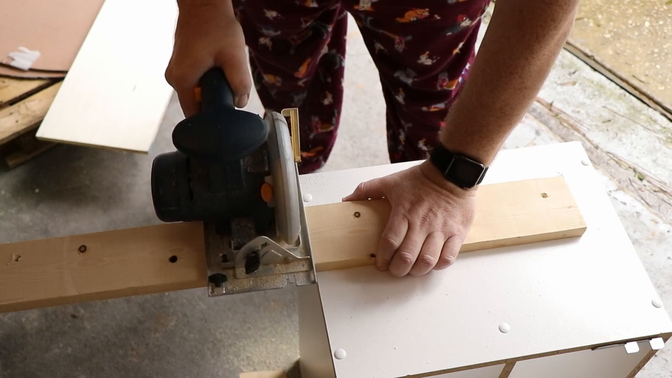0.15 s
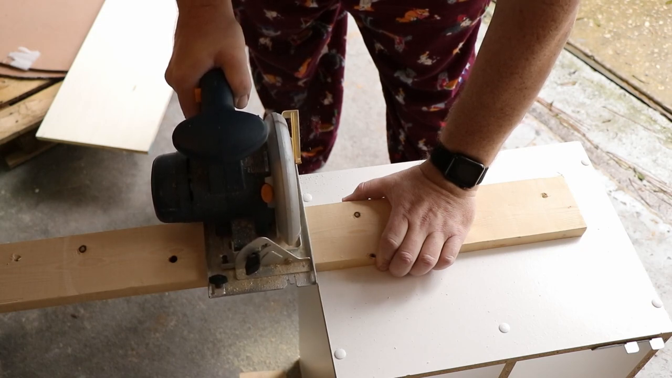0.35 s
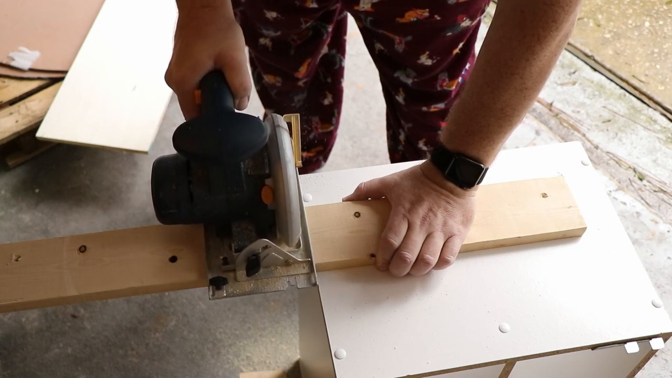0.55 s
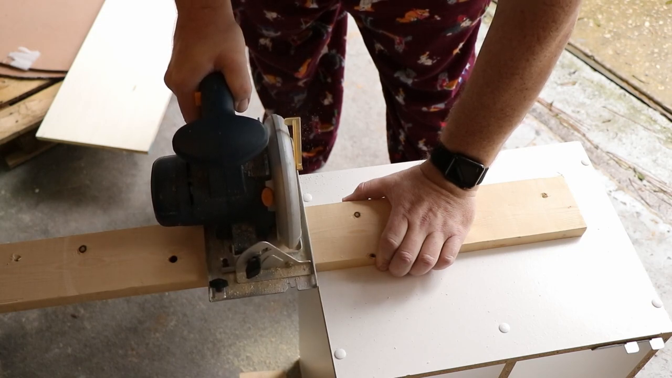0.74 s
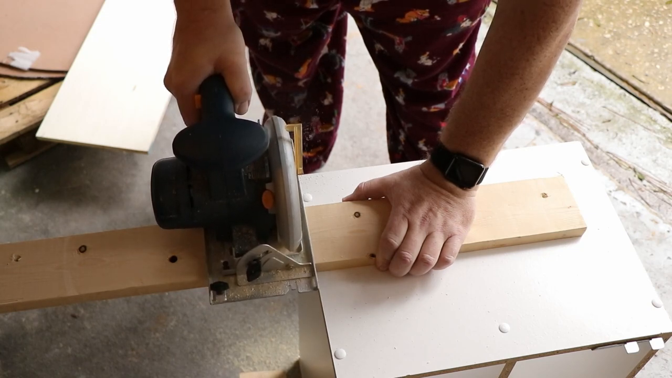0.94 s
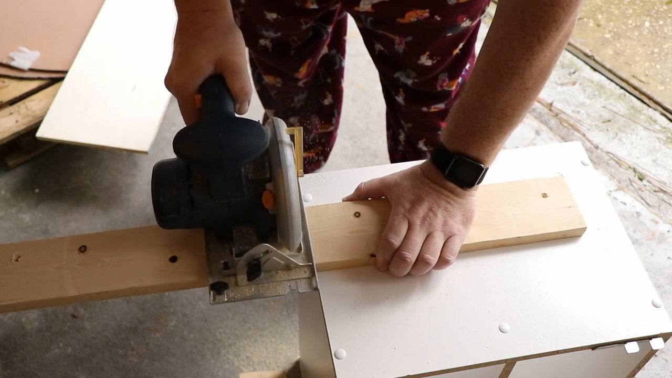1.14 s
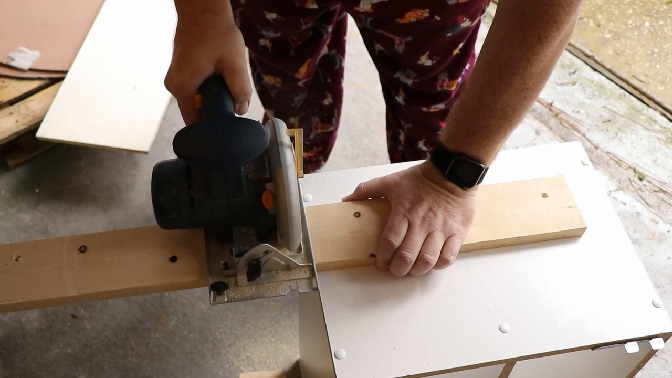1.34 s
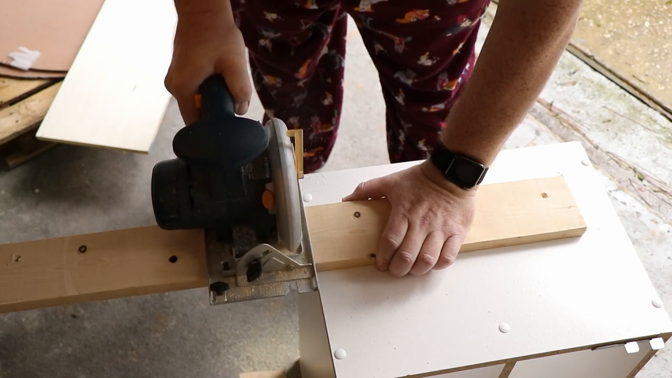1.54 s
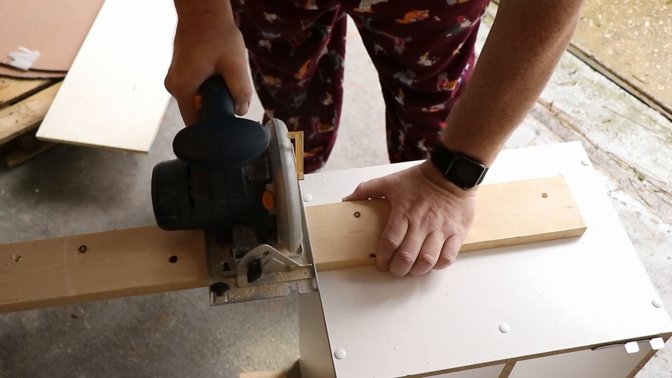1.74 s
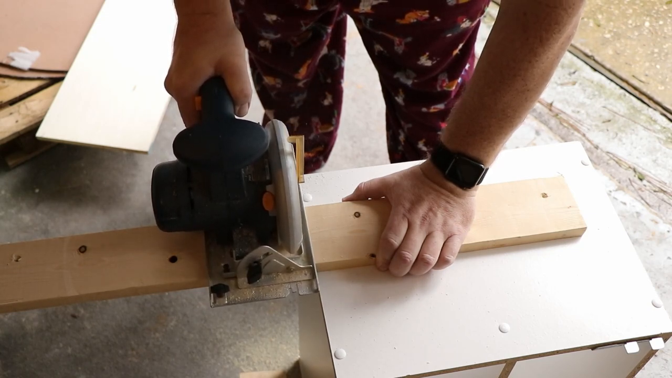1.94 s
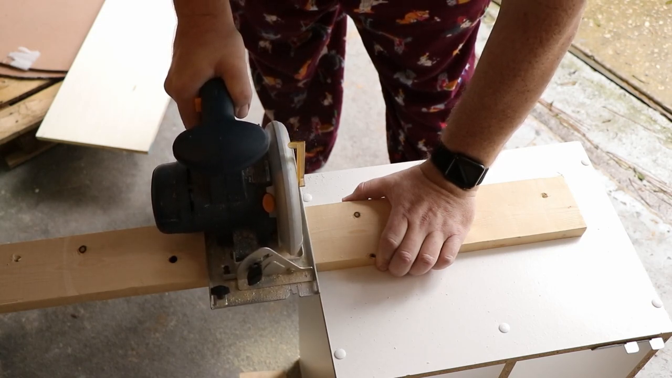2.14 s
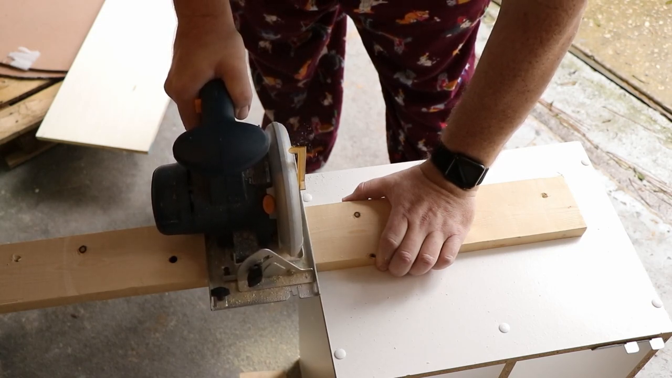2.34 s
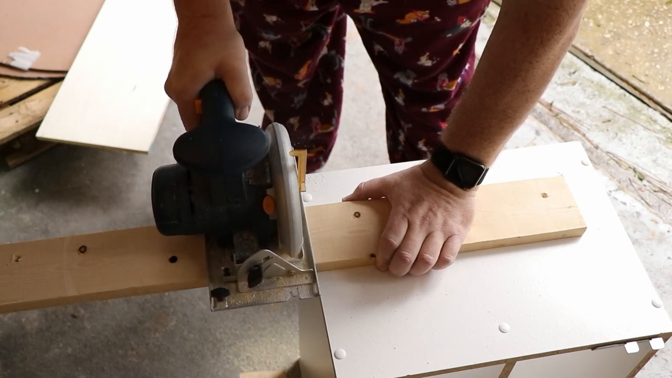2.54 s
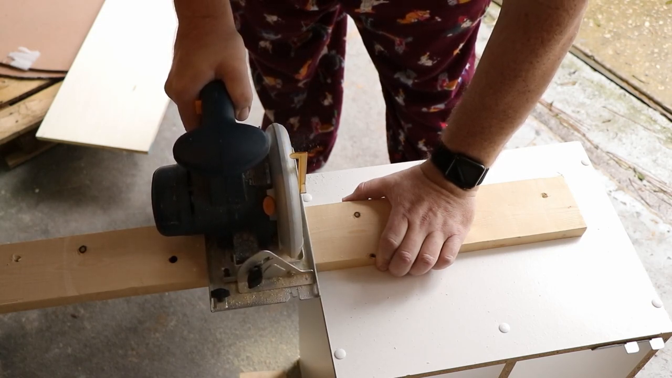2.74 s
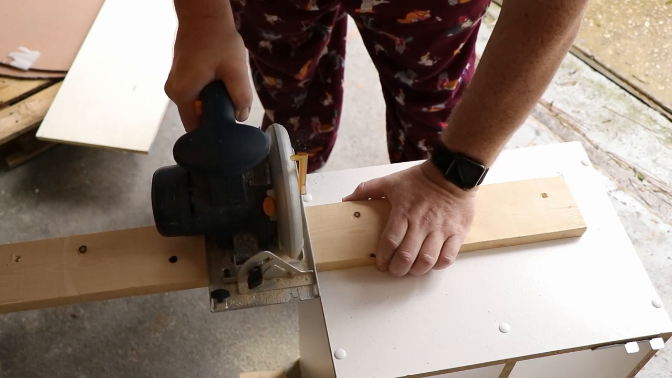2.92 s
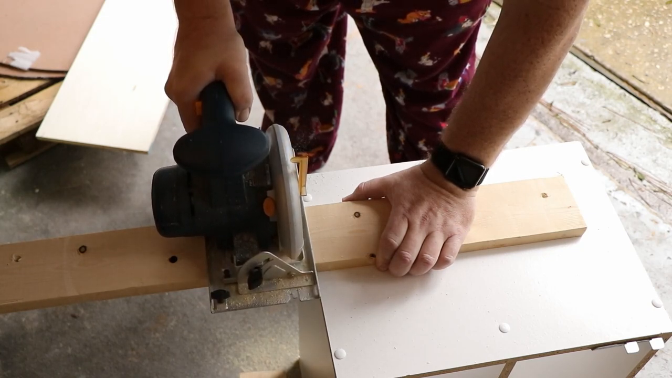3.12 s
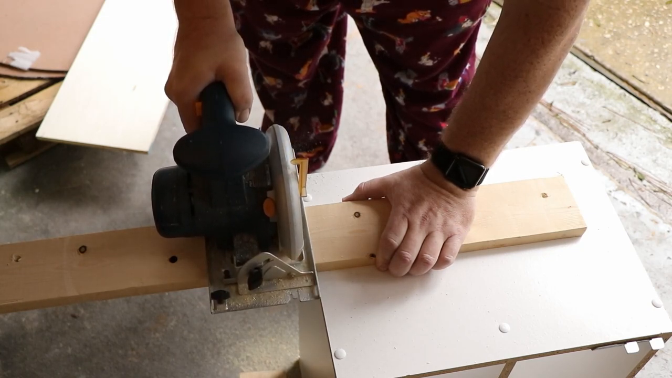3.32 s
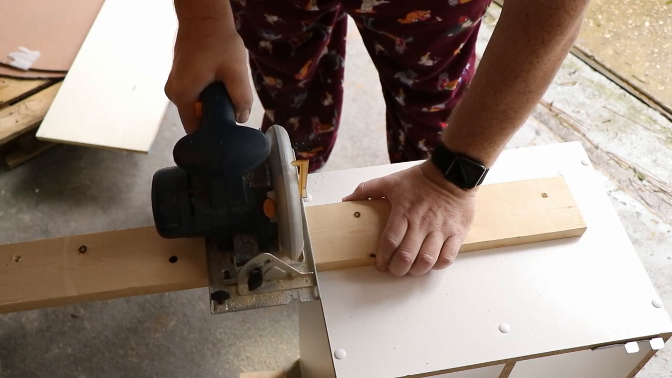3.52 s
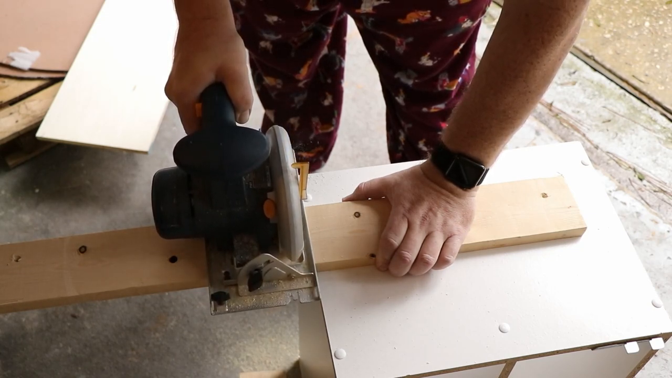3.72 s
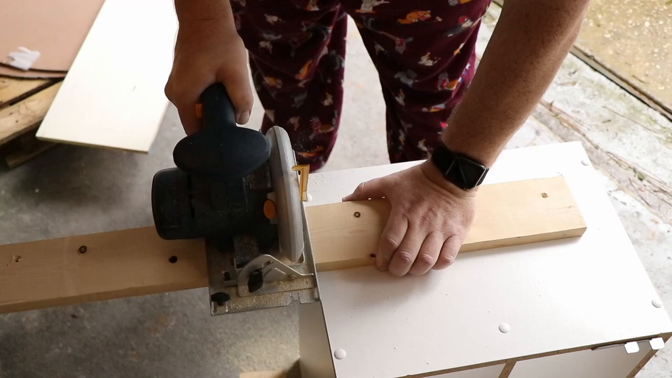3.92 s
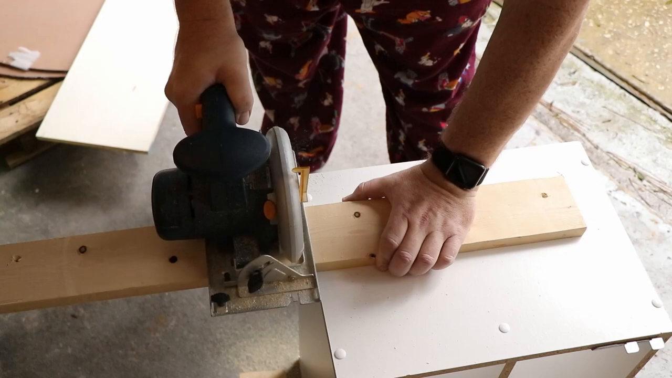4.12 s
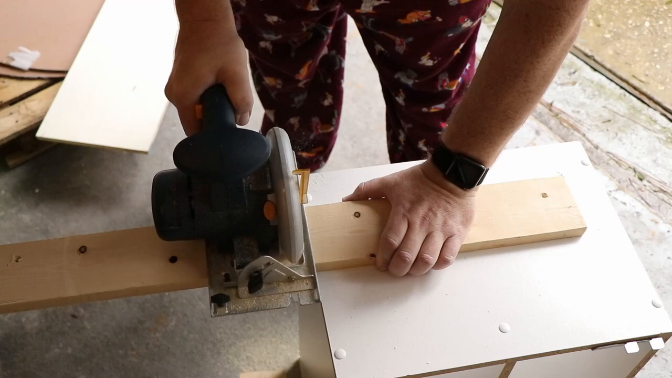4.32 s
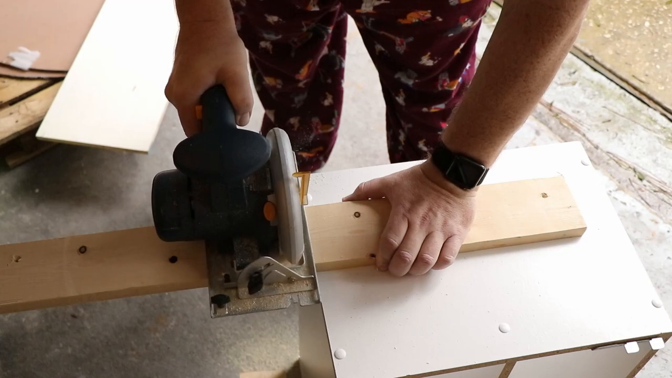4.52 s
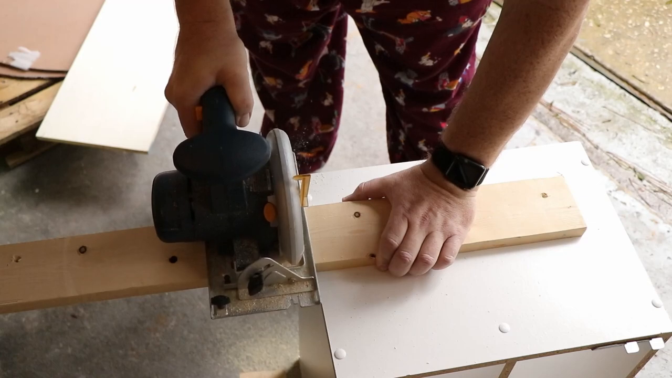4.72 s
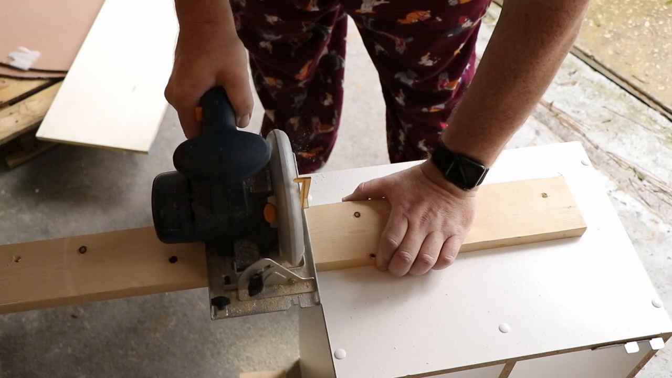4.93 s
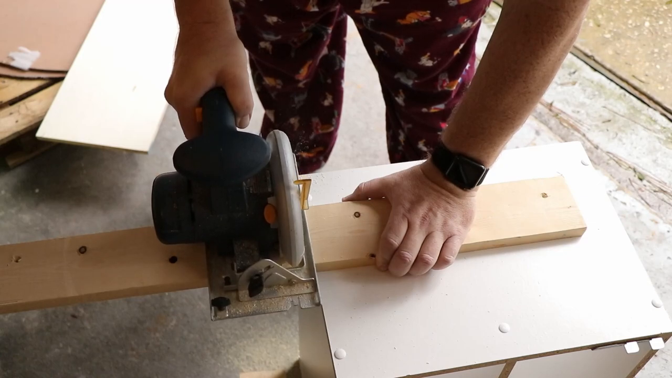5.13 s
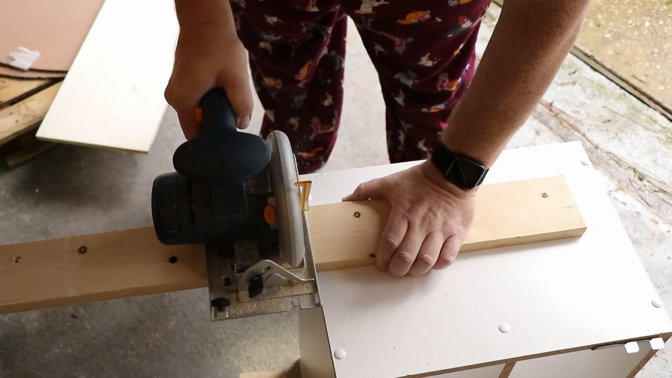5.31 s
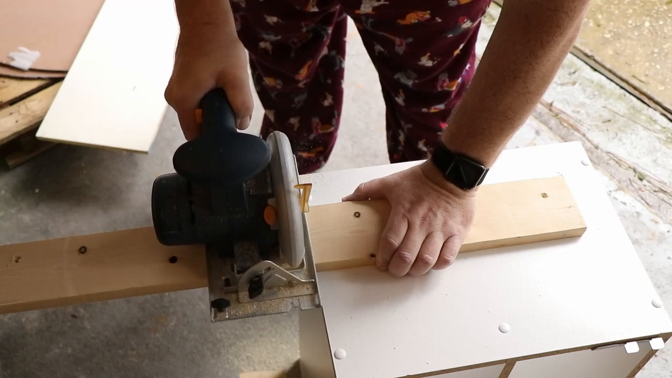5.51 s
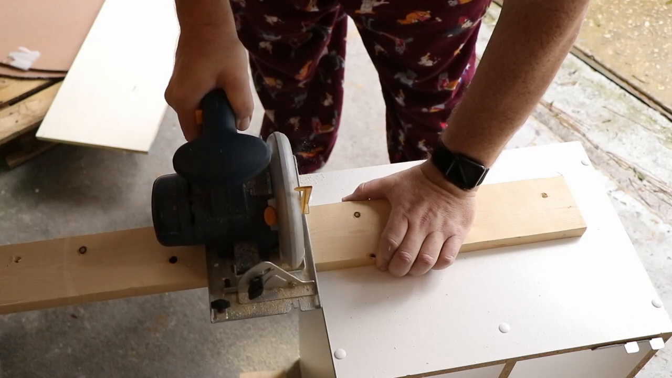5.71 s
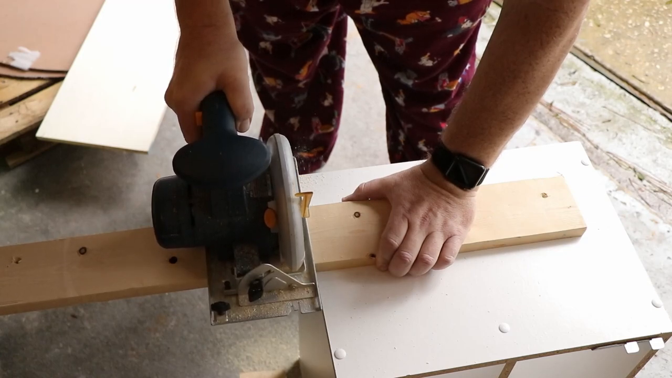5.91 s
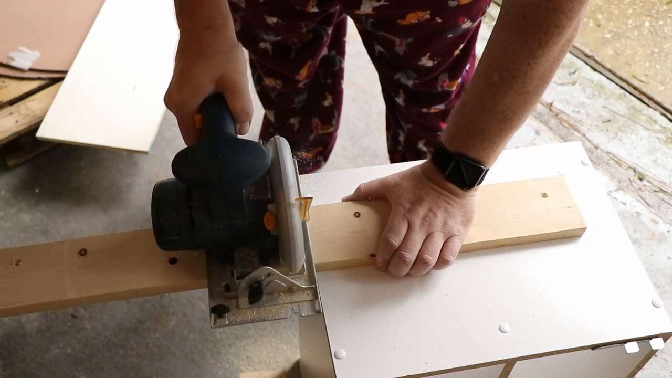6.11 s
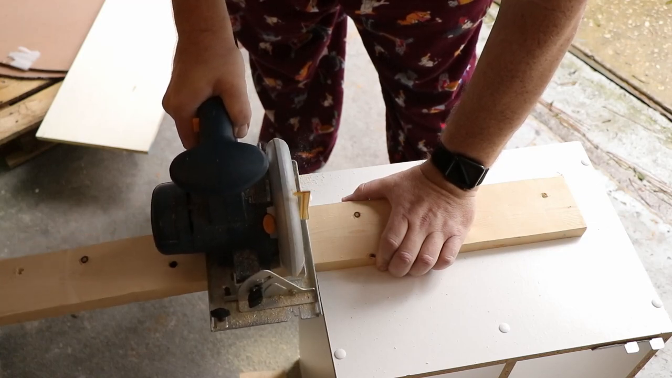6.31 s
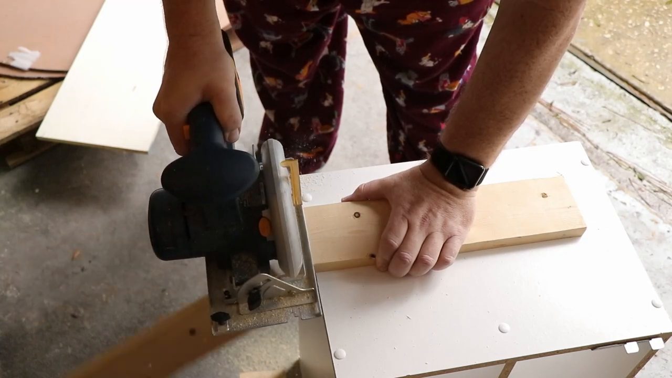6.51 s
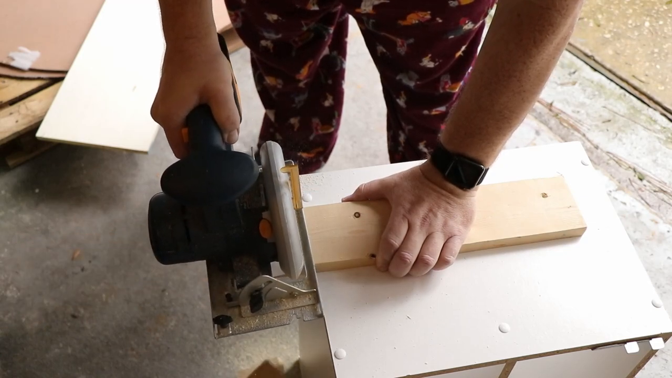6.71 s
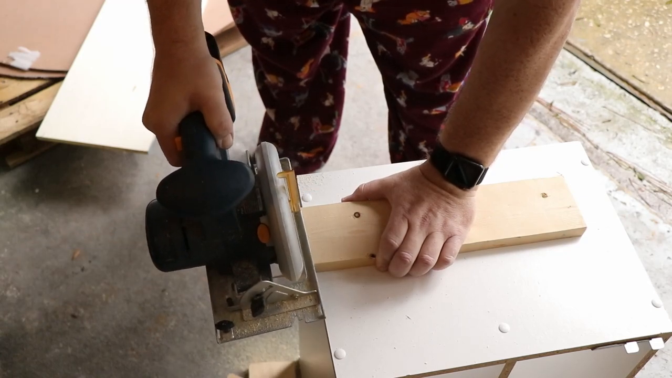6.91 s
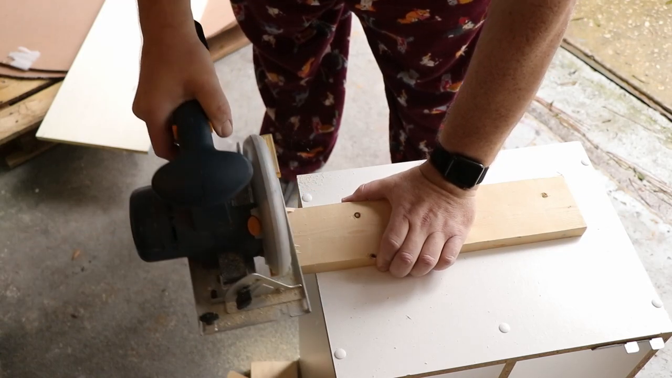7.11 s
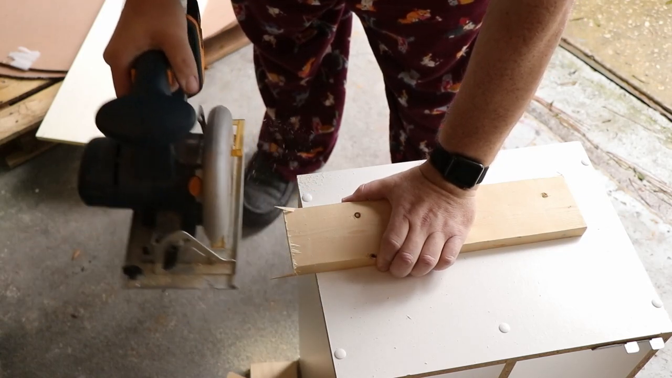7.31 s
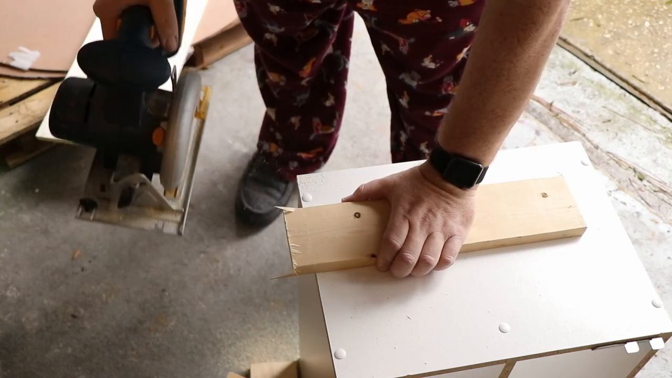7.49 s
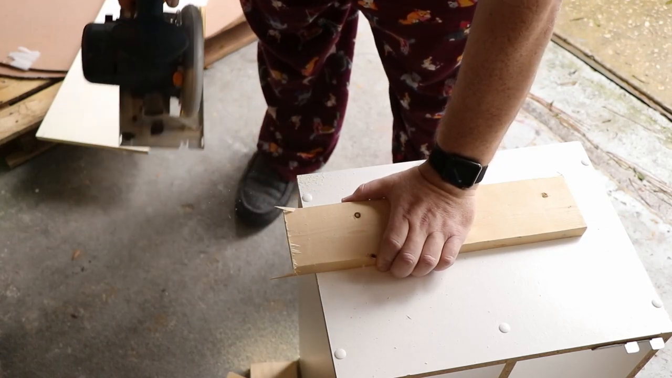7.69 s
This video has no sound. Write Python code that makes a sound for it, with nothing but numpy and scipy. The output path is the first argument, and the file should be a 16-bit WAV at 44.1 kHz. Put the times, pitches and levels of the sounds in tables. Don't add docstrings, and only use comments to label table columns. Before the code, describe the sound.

Close and loud in a hard, echoing garage workshop, saw teeth tear through wood with a dense, rough buzz and shifting piercing tones. Faint bench thuds sit beneath the early cut. After about six seconds the load releases, the board cracks, the loose piece thumps down, the spinning blade drags and rings briefly, the guard snaps closed, and only an airy motor whir remains. Bass is thin and peaks are squashed.

```python
import sys
import numpy as np
from scipy import signal
from scipy.fft import rfft, irfft, next_fast_len
from scipy.io import wavfile
from scipy.ndimage import uniform_filter1d, minimum_filter1d, map_coordinates

SR = 44100
rng = np.random.default_rng(int(sys.argv[2]) if len(sys.argv) > 2 else 0)


def level_to_linear(level):
    exponent = np.asarray(level, float) / 20
    return 10 ** exponent


def master_out(mix):
    frames = np.transpose(np.atleast_2d(mix))
    ceiling = np.clip(frames, -1, 1)
    pcm = np.round(ceiling * 32767).astype(np.int16)
    wavfile.write(sys.argv[1], SR, pcm)


N = 341765


def unit(x):
    return x / np.sqrt(np.mean(x ** 2) + 1e-20)


def along(points, hz):
    point_hz, value = np.transpose(points)
    return np.interp(np.log(hz + 1), np.log(point_hz + 1), value)


def curves(rows):
    time_s, *columns = np.transpose(rows)
    return [np.interp(np.arange(N) / SR, time_s, column) for column in columns]


def wobble(rate_hz, t=None):
    t = np.arange(N) / SR if t is None else t
    knots = rng.standard_normal(int(N * 300 / SR) + 4)
    return map_coordinates(knots, [t * min(rate_hz, 300)], order=2)


def filtered(x, response):
    m = next_fast_len(N + SR)
    return irfft(rfft(x, m) * response(np.fft.rfftfreq(m, 1 / SR)), m)[..., :N]


def resonance(f, hz, width_hz):
    return 1j * f * width_hz / (hz * hz - f * f + 1j * f * width_hz)


def peaked(f, spectrum, modes):
    peaks = sum((level_to_linear(db) - 1) * np.abs(resonance(f, hz, width_hz)) ** 2 for hz, width_hz, db in modes)
    return level_to_linear(along(spectrum, f)) * (1 + peaks)


# (time [s], speed [turns/s])
SHAFT_SPEED = [(0, 62.9), (.18, 62.7), (.47, 64.4), (.79, 62.4), (1.04, 63.8), (1.29, 62.1), (1.58, 63.15),
               (1.94, 63.3), (2.3, 60.2), (2.55, 59.7), (3.08, 60.6), (3.33, 59.9), (3.86, 59.8),
               (4.6, 57.5), (5.44, 56.65), (5.66, 55.55), (6.26, 53.9), (6.47, 58)]
RUN_UP_TURNS_PER_S2, FREE_TURNS_PER_S, INERTIA_S = 8.8, 66, .1


def shaft():
    since_free = np.maximum(np.arange(N) / SR - SHAFT_SPEED[-1][0], 0)
    speed = np.minimum(curves(SHAFT_SPEED)[0] + RUN_UP_TURNS_PER_S2 * since_free, FREE_TURNS_PER_S)
    speed = uniform_filter1d(speed, round(INERTIA_S * SR))
    return np.cumsum(speed) / SR, speed


# (time [s], force [dB], sharpness of bite [dB])
FEED = [(0, -21.5, -4), (.11, -16.5, -4), (.44, -21, -4.5), (.86, -16.5, -6.5), (1.15, -17, -5.5),
        (1.63, -17, -4.5), (2.13, -17, -9), (2.55, -14.5, -9.5), (3.3, -16.5, -8.5), (4.1, -18, -8),
        (4.36, -17.5, -8.5), (4.69, -17, -7), (5.33, -15.5, -9), (5.94, -16, -7), (6.2, -16, -6),
        (6.43, -20.5, -6.5), (6.53, -26.5, -4.5), (6.61, -21, -10.5)]
# (start [s], length [s], force [dB], sharpness [dB])
CONTACTS = [
    (6.637, .052, -13, 2),
    (6.772, .12, -16, -1),
    (6.89, .155, -19, 1),
    (7.075, .125, -17, -1),
]
ATTACK_S, LET_GO_DB_PER_S, DULLING_DB_PER_S = .01, 330, 200


def teeth():
    t = np.arange(N) / SR
    long_cut = (-0.94, 1 + FEED[-1][0], *curves(FEED))
    force, sharp = np.full(N, 1e-6), np.zeros(N)
    for start, length, db, sharp_db in [long_cut] + list(CONTACTS):
        after = np.maximum(t - start - length, 0)
        attack = np.clip((t - start) / ATTACK_S, 0, 1)
        push = level_to_linear(db - LET_GO_DB_PER_S * after) * attack
        force += push
        sharp += push * (sharp_db - DULLING_DB_PER_S * after)
    return force, sharp / force


STEPS_PER_TURN = 512


def pattern(turns, period, memory):
    rows = rng.standard_normal((int(turns[-1] / period) + 2, STEPS_PER_TURN * period))
    for _ in range(2):
        rows = uniform_filter1d(rows, max(round(memory), 1), axis=0)
    return unit(map_coordinates(rows.ravel(), [turns * STEPS_PER_TURN]))


TEETH = 24
# (time [s], level [dB])
LOCKED_LEVEL = [(0, -9), (1.1, -3.5), (1.4, -2.5), (2, -11), (2.2, -16.5), (2.6, -11.5), (3.3, -9),
                (4.2, -2), (5, -8.5), (5.4, -20.5), (6.1, -3), (6.5, 3.5), (7.75, -5.5)]
# (frequency [Hz], gain [dB])
LOCKED_COLOUR = [(100, -6), (700, -5), (1600, 2), (3000, -2), (6000, -5), (10000, -9)]
# (frequency [Hz], level [dB/Hz])
CUT_COLOUR = [(35, -86.5), (60, -55), (340, -32.5), (449, -22), (909, -18), (1100, -3), (1520, -3),
              (2010, -2), (2430, -18), (2830, -17), (3500, -18.5), (4070, -15), (10000, -30.5),
              (13000, -81), (22000, -120)]
# (frequency [Hz], width [Hz], level over colour [dB])
DAMPED_MODES = [(726, 28, 4), (1414, 40, 3.5), (1518, 130, 6.5), (2023, 73, 2), (2200, 110, 2),
                (2570, 87, 5.5), (2840, 76, 6), (3210, 250, -7.5), (4014, 34, 8), (4900, 46, 1.5),
                (5750, 70, 1.5), (6345, 120, 5), (8500, 150, 7)]
# (frequency [Hz], gain [dB])
ENTRY_COLOUR = [(100, 0), (2400, 3), (2600, 1.5), (3300, 18), (3550, -16.5), (4150, -6), (4350, 8),
                (4900, 6), (5300, 2), (10000, -2)]
# (frequency [Hz], gain [dB])
EXIT_COLOUR = [(100, 6), (1450, 4), (1750, 1), (2300, -5.5), (2800, 4.5), (3200, -3.5), (3800, 6.5),
               (4200, -8), (4600, -10.5), (5300, -4), (6200, 4), (8400, 4), (9600, 8)]
# (time [s], entering share [0-1], leaving share [0-1])
DEPTH = [(0, 0.59, 0.38), (.9, 0.36, 0.2), (1.3, 0.11, 0), (5.7, 0.17, 0.35), (6.3, 0.06, 0.21),
         (6.7, 0, 0.3), (6.8, 0, 0.68), (7.75, 0.1, 1)]
PART_EDGES_HZ = (900, 2350, 5000)
# (level against force [dB], share of sharpness [1])
PARTS = [
    (-1, 0.017),
    (-17, 0.51),
    (-0.5, 1.023),
    (-12, 1.23),
]


def cut(turns):
    angle = 2 * np.pi * turns
    bite_db = 1.53 * np.sin(angle) + 1.43 * np.sin(2 * angle + 3.95) + 1.5 * np.sin(TEETH * angle)
    tearing = unit(level_to_linear(bite_db) * level_to_linear(1.4 * wobble(60)) * rng.standard_normal(N))
    locked = pattern(turns, period=1, memory=19.9) + level_to_linear(-0.5) * pattern(turns, period=3, memory=7)
    locked = filtered(locked, lambda f: level_to_linear(along(LOCKED_COLOUR, f)))
    force = tearing + level_to_linear(curves(LOCKED_LEVEL)[0]) * locked
    sound = filtered(force, lambda f: peaked(f, CUT_COLOUR, DAMPED_MODES))
    sound *= level_to_linear(.65 * wobble(7) + 1.1 * wobble(22))

    entering, leaving = np.clip(curves(DEPTH), 0, 1)
    shallow, free = filtered(sound, lambda f: level_to_linear([along(ENTRY_COLOUR, f), along(EXIT_COLOUR, f)]))
    sound += entering * (shallow - sound) + leaving * (free - sound)

    board, to_mid, to_high = filtered(sound, lambda f: [1 / (1 + (f / hz) ** 12) for hz in PART_EDGES_HZ])
    bands = to_mid - board, board, to_high - to_mid, sound - to_high
    flutters_db = (0.08 * wobble(11), 0.78 * wobble(7.8), 0.8 * wobble(8.5),
                   0.5 * wobble(12) + 0.47 * wobble(250))
    push, sharp_db = teeth()
    out = np.zeros(N)
    for (db, share), band, flutter_db in zip(PARTS, bands, flutters_db):
        level_db = db + share * sharp_db + flutter_db
        out += level_to_linear(level_db) * band / np.std(band[SR:6 * SR])
    return push * out


# (shaft order [1], level at loaded speed [dB rms], growth [dB per turn/s lost])
GEAR_ORDERS = [(3, -62.5, 1), (6, -63, 1.5), (7, -51, 1.5), (9, -46.5, 1), (10, -49.5, 0), (12, -45.5, 1.5)]
LOADED_TURNS_PER_S, THROUGH_S = 60, 6.45


def gears(turns, speed):
    hum = np.zeros(N)
    for order, db, grow_db in GEAR_ORDERS:
        level_db = db + grow_db * (LOADED_TURNS_PER_S - speed) + 3 * wobble(5)
        hum += level_to_linear(level_db) * np.sin(2 * np.pi * round(order) * turns)
    return hum * np.clip((THROUGH_S - np.arange(N) / SR) / .08 + 1, 0, 1)


GUARD_SHUT_S = 7.3
# (frequency [Hz], level [dB/Hz])
FAN_COLOUR = [(35, -43.5), (100, -19), (250, -23), (600, -8), (1100, 2), (1500, -1), (2300, -11.5),
              (3000, -10.5), (4200, -27), (4600, -29), (6000, -30.5), (7400, -34.5), (10000, -38.5),
              (13000, -61.5)]
# (frequency [Hz], width [Hz], level [dB])
HOUSING_MODES = [(577, 24, 8), (1060, 42, 8), (2150, 92, 13), (3970, 1400, 10), (6400, 300, 11.5),
                 (8850, 700, 19.5)]
# (frequency [Hz], level [dB rms])
GUARD_TONES = [(619, -50.5), (1163, -37.5), (1513, -44), (2056, -48.5), (2094, -36.5), (3840, -52),
               (3935, -54)]
# (time [s], level [dB])
MOTOR_LEVEL = [(7.36, -31), (7.75, -30)]


def motor():
    t = np.arange(N) / SR
    gusts = level_to_linear(1.4 * wobble(45)) * rng.standard_normal(N)
    rush = unit(filtered(gusts, lambda f: peaked(f, FAN_COLOUR, HOUSING_MODES)))
    tones = np.zeros(N)
    for hz, db in GUARD_TONES:
        level = level_to_linear(db + 34 + 3 * wobble(30))
        tones += level * np.sin(2 * np.pi * hz * t + 0.77 * wobble(30))
    shut = np.clip((t - GUARD_SHUT_S) / 0.026, 0, 1)
    return level_to_linear(curves(MOTOR_LEVEL)[0] - 2.5) * (rush + shut * tones)


# (start [s], end [s], shaft order [1], level [dB rms])
SINGING_ORDERS = [(0.034, 0.336, 24, -17.5), (0.466, 0.76, 22, -23.5), (0.693, 0.958, 24, -17),
                  (0.977, 1.958, 24, -16), (1.2, 1.552, 29, -19.5), (0.946, 2.095, 30, -23),
                  (1.223, 2.0, 25, -21), (1.625, 2.058, 72, -34), (1.6, 2.1, 63, -30.5),
                  (2.0, 2.896, 8, -47), (2.35, 3.3, 25, -20.5), (2.52, 3.018, 24, -22),
                  (2.55, 2.996, 27, -27), (2.996, 4.498, 26, -28.5), (3.81, 4.433, 36, -34),
                  (3.96, 4.36, 28, -25), (4.018, 4.43, 44, -33), (4.427, 5.374, 33, -22),
                  (4.71, 5.16, 78, -34), (4.777, 5.297, 32, -22), (5.547, 6.11, 27, -17),
                  (5.75, 6.15, 33, -20), (1.195, 3.898, 66, -35), (2.396, 4.213, 48, -39.5),
                  (6.105, 6.5, 26, -40), (6.647, 6.696, 30, -6.5)]


def song(turns):
    out = np.zeros(N)
    for start, end, order, db in SINGING_ORDERS:
        i = np.arange(max(round((start - .1) * SR), 0), round((end + .1) * SR))
        t = i / SR
        fade_s = min(.14, .4 * (end - start))
        swell = np.clip(np.minimum(t - start, end - t) / fade_s + .6, 0, 1) ** 2
        flicker = level_to_linear(1.8 * wobble(8, t) + 1.5 * wobble(25, t))
        phase = 2 * np.pi * round(order) * turns[i] + 0.56 * wobble(14, t)
        out[i] += level_to_linear(db - 1.0) * flicker * swell * np.sin(phase)
    return out


# (time [s], peak [dB], pitch [Hz], t60 [s])
KNOCKS = [(.78, -43, 165, 0.13), (1.1, -43.5, 207, 0.33), (1.22, -35.5, 153, 0.077),
          (1.452, -35.5, 249, 0.11), (1.601, -41.5, 174, .15), (1.751, -51.5, 216, 0.2),
          (6.655, -24.5, 160, 0.099), (6.662, -22, 336, 0.089), (6.65, -16, 716, 0.26),
          (6.909, -11, 595, 0.057), (6.914, -8.5, 425, 0.086), (7.033, -22.5, 436, 0.084),
          (7.133, -26, 187, 0.057), (7.294, -9, 1205, .05), (7.296, -23.5, 447, 0.084),
          (7.305, -16, 1027, 0.13), (7.306, -25, 745, 0.034), (7.319, -16.5, 900, 0.061),
          (7.33, -10, 1100, 0.024), (7.361, -26, 2110, 0.034)]


def knocks():
    out, t = np.zeros(N + SR), np.arange(SR // 3) / SR
    for s, db, hz, t60 in KNOCKS:
        rough, noise = rng.standard_normal((2, len(t)))
        smear = .5 * unit(signal.lfilter(*signal.butter(2, .4 * hz / SR), rough))
        ring = np.sin(2 * np.pi * hz * t + smear) + 0.72 * np.sin(2 * np.pi * 1.7 * hz * t - smear)
        dull = unit(signal.lfilter(*signal.butter(2, [hz / SR, 6 * hz / SR], "band"), noise))
        crack = 0.17 * level_to_linear(-60 * t / t60) * dull
        envelope = level_to_linear(db - 60 * t / t60) * (1 - np.exp(-t / 0.0013))
        out[round(s * SR):][:len(t)] += envelope * (ring + crack)
    return signal.lfilter(*signal.butter(2, 260 / SR, "high"), out[:N])


# (frequency [Hz], level [dB], t60 [s])
FREE_MODES = [(1414, -12, .2), (1515, 0, .33), (2105, -17, .17), (2584, -20, .3), (2702, -19, .35),
              (2853, -19, .35), (3790, -14, .1), (3900, -14, .1)]
# (time [s], level [dB])
SCRAPE_LEVEL = [
    (6.76, -57),
    (6.78, -14),
    (6.9, -19),
    (7.06, -19),
    (7.15, -11),
    (7.2, -24),
    (7.23, -66),
]
# (time [s], level [dB])
FLICKS = [
    (7.099, -19),
    (7.19, -23),
]


def ringing():
    def modes(f):
        return sum(level_to_linear(db) * np.sqrt(t60) * resonance(f, hz, np.log(1000) / np.pi / t60)
                   for hz, db, t60 in FREE_MODES)

    noise, flick = rng.standard_normal(N), np.zeros(N)
    for s, db in FLICKS:
        flick[round(s * SR)] = level_to_linear(db + 45.5)
    drive = level_to_linear(curves(SCRAPE_LEVEL)[0]) * noise + flick
    choke = level_to_linear(-600 * np.maximum(np.arange(N) / SR - GUARD_SHUT_S, 0))
    return choke * filtered(drive, modes) / np.std(filtered(noise, modes))


# (frequency [Hz], t60 [s])
ROOM_DECAY = [(150, 0.52), (1500, 0.61), (5000, 0.45), (10000, 0.13)]


def workshop(x):
    hz, t, z = signal.stft(rng.standard_normal(SR // 2), SR, nperseg=256)
    decay = level_to_linear(-60 * t / along(ROOM_DECAY, hz)[:, None])
    tail = signal.istft(z * decay, SR, nperseg=256)[1]
    delayed = np.pad(x, (300, 0))
    return signal.fftconvolve(delayed, tail / np.linalg.norm(tail))[:N]


def scene():
    turns, speed = shaft()
    saw = cut(turns) + knocks()
    tones = song(turns) + gears(turns, speed) + ringing()
    wet = workshop(level_to_linear(-14) * saw + level_to_linear(-22) * tones)
    return (saw + tones + wet + motor())[None]


def top_cut(x):
    return signal.sosfilt(signal.butter(12, 15740, fs=SR, output="sos"), x)


def record(dry):
    gain = np.minimum(1, .43 / (np.abs(dry) + 1e-9)) ** .9
    held = dry * uniform_filter1d(minimum_filter1d(gain, size=75), size=37)
    band = filtered(held, lambda f: f / (f + 60) / (1 + (f / 10000) ** 130))
    hiss = filtered(rng.standard_normal((1, N)), lambda f: np.abs(resonance(f, 14200, 3500)) ** 3)
    return top_cut(band + level_to_linear(-76) * hiss)


dry = scene()
out = record(dry)
master_out(out)
```